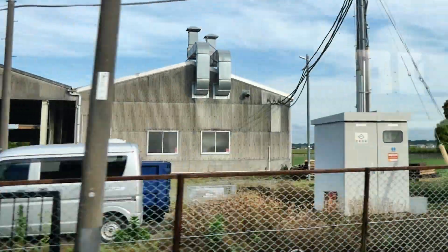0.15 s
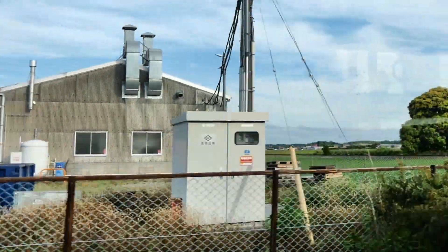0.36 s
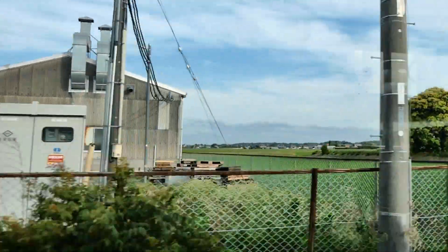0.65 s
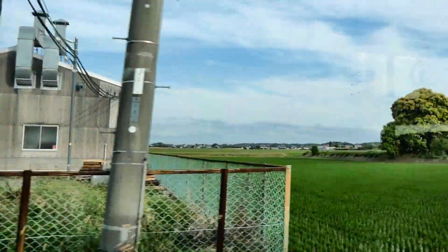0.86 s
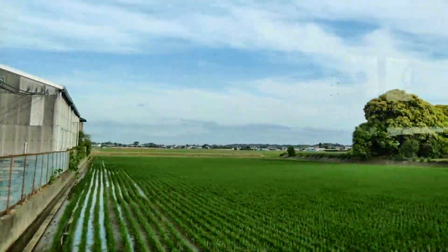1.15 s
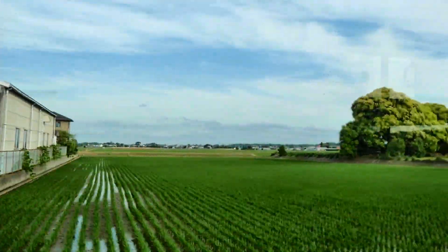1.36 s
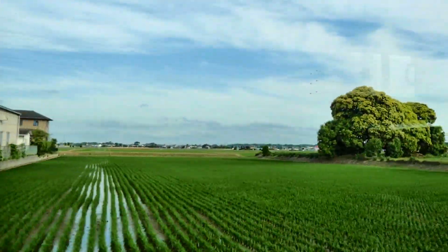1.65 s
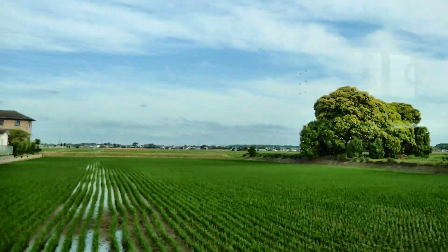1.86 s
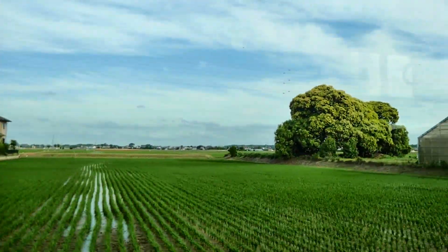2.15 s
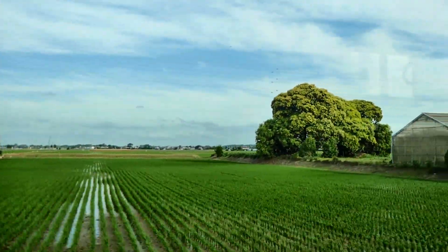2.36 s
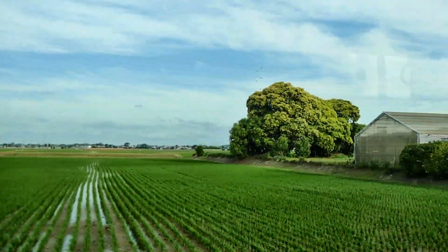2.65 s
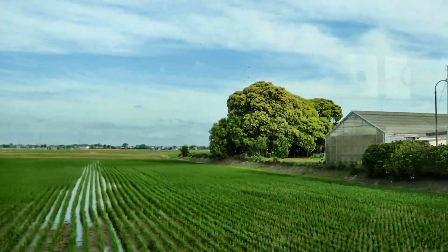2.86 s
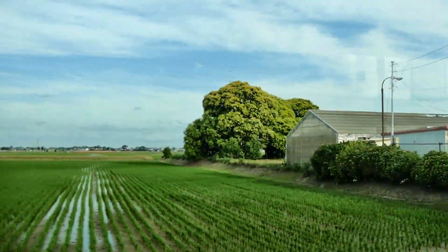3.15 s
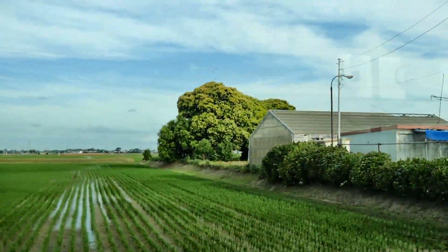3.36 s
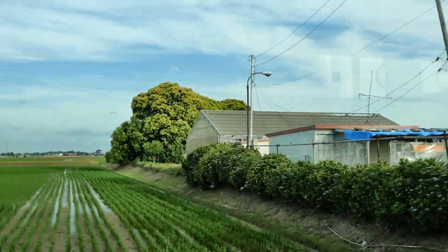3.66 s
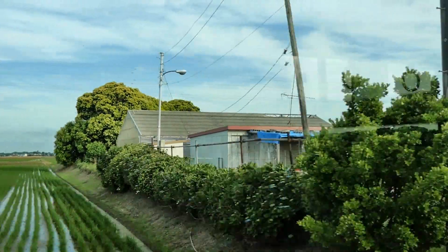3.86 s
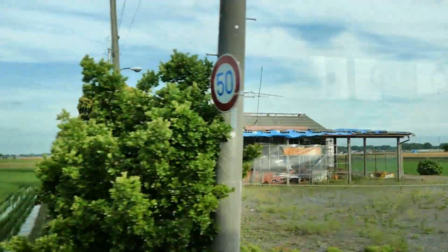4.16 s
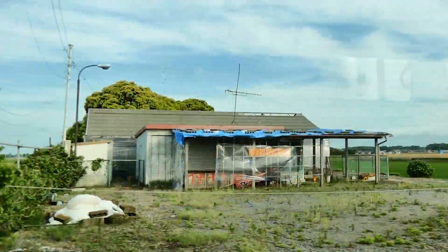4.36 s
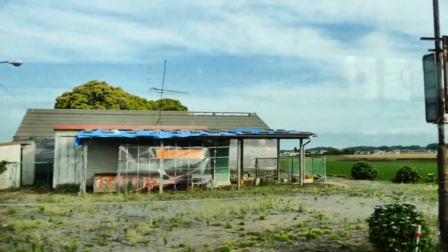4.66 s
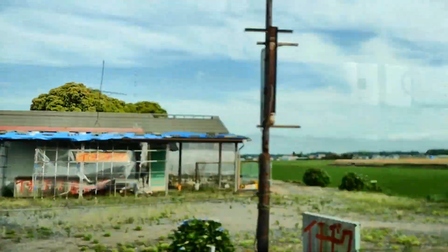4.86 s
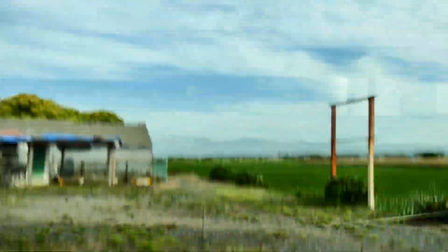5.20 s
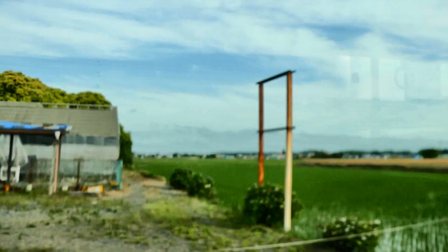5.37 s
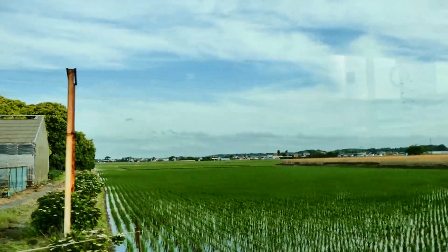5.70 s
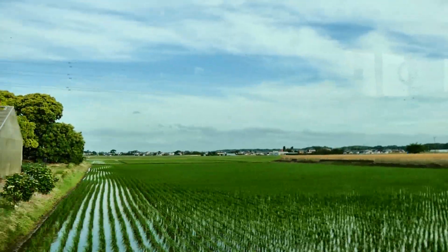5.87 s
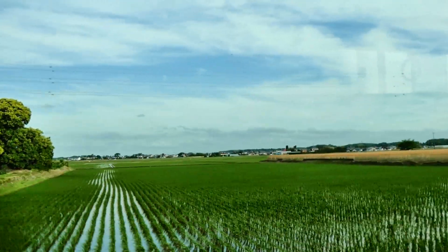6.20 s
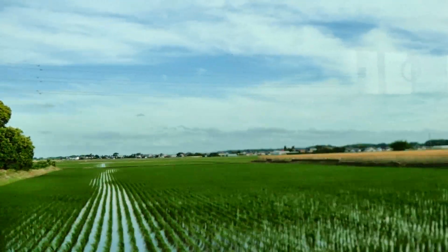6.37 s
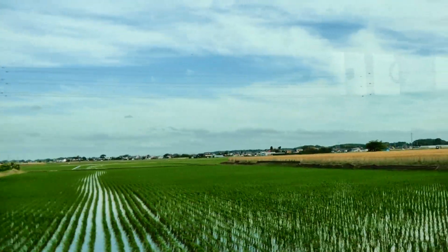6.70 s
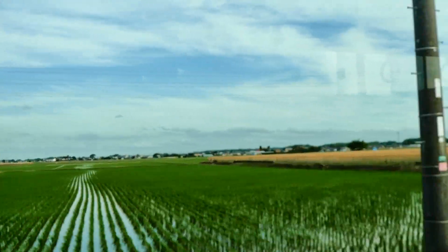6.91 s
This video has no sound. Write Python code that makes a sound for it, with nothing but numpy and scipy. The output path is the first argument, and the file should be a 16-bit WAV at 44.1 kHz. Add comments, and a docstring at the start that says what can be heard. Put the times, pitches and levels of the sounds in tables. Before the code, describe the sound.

A passenger's close perspective in a hollow bus cabin: full, bass-heavy road roar at constant speed, a thin electric drive tone, and airy hiss swelling lightly. A few dry interior clicks and tiny stuttering treble whistles dot the first part. Then two heavy, muffled jolts follow closely, shaking loose fittings with dry clacks and a small metallic clink, before the ride settles into calmer rumble.

```python
"""Tyres rumble through the floor of an electric bus at a steady speed and boom in the cabin: coloured noise.
The drive whines in wavering sine tones, and noise hiss swells and sinks at the window.
Trim ticks as coloured impulses, a metal part clinks, and a thin chirp comes and goes in the treble.
Both axles cross a rough patch: the floor thumps in dying sines, fittings rattle, smoother road follows."""
import sys
import numpy as np
from scipy import signal
from scipy.fft import rfft, irfft
from scipy.io import wavfile

SR = 44100
rng = np.random.default_rng(int(sys.argv[2]) if len(sys.argv) > 2 else 0)


def store_wav(level_fs):
    """Save 16-bit WAV to argv[1]."""
    pcm = np.round(np.clip(np.atleast_2d(level_fs), -1, 1) * 32767)
    wavfile.write(sys.argv[1], SR, pcm.T.astype(np.int16))


N = 310464
TIME = np.arange(N) / SR
BINS = np.fft.rfftfreq(N, 1 / SR)

# hollow cabin resonances and the dips between them: (frequency [Hz], width [Hz], lift [dB])
CABIN_RESONANCES = [(148, 31, 3.5), (196, 14, 7), (230.7, 25, 3), (271, 15, -2.5), (333, 47, 1.5),
                    (398, 39, -4), (519, 18, -2), (588, 22, 1.5), (715, 37, 4.5), (740, 26, -1),
                    (880, 57, 2), (1107, 32, -2), (1150, 64, 1.5), (1430, 106, 4)]


def gain_of(db):
    """Decibels to gain."""
    return 10 ** (np.asarray(db) / 20)


def evened(x):
    """Scaled to rms 1."""
    return x / np.sqrt(np.mean(x ** 2) + 1e-20)


def read(points, hz):
    """A spectrum table read on a log-frequency axis."""
    f, value = np.transpose(points)
    return np.interp(np.log(hz + 1), np.log(f + 1), value)


def follow(rows):
    """A curve over time at every sample."""
    return np.interp(TIME, *np.transpose(rows))


def panned(lean_db):
    """Left and right gains for a left-minus-right level difference."""
    return gain_of(np.array([lean_db, -lean_db]).reshape(2, -1) / 2)


def add(mix, s, sound):
    """Mixes a sound in at time s."""
    part = mix[:, max(round(s * SR), 0):][:, :sound.shape[-1]]
    part += sound[..., :part.shape[1]]


def drift(rate_hz):
    """Random drift of rms 1, mostly slower than rate_hz."""
    lowpass = 1 / (1 + (BINS / rate_hz) ** 4)
    return evened(irfft(rfft(rng.standard_normal(N)) * lowpass, N))


def lift_db(resonances):
    """Lift of a set of resonances at each frequency of the long spectrum."""
    return sum(db / (1 + (2 * (BINS - hz) / width) ** 2) for hz, width, db in resonances)


def noise(spectrum_db):
    """Noise in the cabin, rms 1: alike at both ears in the bass, diffuse in the treble."""
    # difference between the ears: (frequency [Hz], side minus mid [dB])
    ear_width = [(30, -23), (70, -30), (170, -45), (280, -19.5), (450, -19), (700, -9), (1000, 1.5),
                 (2000, -1), (5000, -0.5), (9000, 0), (14000, -5)]
    # lean to one ear: (frequency [Hz], left minus right [dB])
    ear_lean = [(60, 0.5), (450, -0.5), (700, 2), (1000, 5.5), (1400, -1.5), (2500, -1.5), (5500, -2),
                (10000, 0)]
    mid, side = rfft(rng.standard_normal((2, N)))
    width = gain_of(read(ear_width, BINS))
    ears = np.array([mid + width * side, mid - width * side]) / np.sqrt(1 + width ** 2)
    coloured = ears * panned(read(ear_lean, BINS)) * gain_of(spectrum_db)
    return evened(irfft(coloured, N))


def ring(modes, t, scatter):
    """Dying modes, detuned a little by every blow, with chance phases at each ear."""
    hz, t60, db = np.transpose(modes)[:, :, None]
    hz = hz * (1 + scatter * rng.standard_normal(hz.shape))
    phase_turns = rng.random((2, len(modes), 1))
    swing = np.sin(2 * np.pi * (hz * t + phase_turns))
    return (gain_of(db - 60 * t / t60) * swing).sum(1)


def surface_db():
    """Coarseness of the road as a level: steady, then sinking to a smoother road."""
    middle_s, over_s, change_db = 5.4, 0.87, -2.5
    return change_db * np.clip((TIME - middle_s) / over_s + .5, 0, 1)


def reflections(x, wet_db, t60):
    """Windows and seats give a short diffuse tail."""
    t = np.arange(SR // 3) / SR
    tail = rng.standard_normal((2, len(t))) * gain_of(-60 * t / t60) * (t > .004)
    tail = tail / np.linalg.norm(tail[0])
    return x + gain_of(wet_db) * signal.fftconvolve(x, tail, axes=1)[:, :N]


def chirps(level_db, width_hz, stutter_db, arch_hz):
    """A narrow, stuttering whistle comes and goes, its pitch rising as it swells."""
    # thin chirps in the treble: (start [s], length [s], level before level_db [dB], mean pitch [Hz])
    whistles = [(.17, .09, -51, 8330), (.6, .08, -49, 8380), (0.794, 0.12, -39, 8400),
                (1.002, 0.059, -43, 8400), (1.127, .05, -53, 8220), (1.29, 0.06, -48, 8200),
                (1.467, .05, -50, 8400), (1.505, 0.1, -42, 8180), (1.545, 0.15, -40, 8480),
                (1.735, .05, -43, 8400), (2.02, .05, -52, 8420), (2.19, 0.19, -46, 8390),
                (2.417, 0.21, -42.5, 8420), (2.658, 0.082, -47, 8400), (2.866, 0.043, -58, 8370),
                (2.95, 0.057, -45, 8460), (3.095, 0.06, -48, 8430), (3.215, .06, -47, 8300),
                (3.37, 0.065, -45, 8400), (3.622, 0.081, -44, 8370), (3.765, 0.11, -49.5, 8420),
                (3.987, 0.06, -45, 8430), (4.222, 0.042, -42, 8420), (4.39, .16, -46, 8350),
                (4.6, .08, -49, 8430), (4.75, 0.17, -37, 8500), (6.125, 0.053, -52, 8400),
                (6.82, .1, -50, 8360), (6.965, .07, -57, 8340)]
    out = np.zeros(N)
    jitter_turns = np.cumsum(width_hz * drift(250)) / SR
    stutter = gain_of(stutter_db * drift(110))
    for s, length, db, hz in whistles:
        on = (TIME > s) & (TIME < s + length)
        swell = abs(np.sin(np.pi * (TIME[on] - s) / length))
        turns = np.cumsum(hz + arch_hz * (swell - swell.mean())) / SR + jitter_turns[on]
        tone = np.sqrt(2) * np.cos(2 * np.pi * turns)
        out[on] += stutter[on] * tone * swell ** 0.45 * gain_of(db + level_db)
    return out


def hiss(level_db, flutter_db):
    """Air and tyre hiss leaks in at the window: a floor that follows the road, and rounded swells."""
    # colour of the hiss: (frequency [Hz], relative level [dB])
    hiss_colour = [(600, 2), (1500, 6), (2500, 5.5), (3800, 2), (5000, -0.5), (6500, 1.5), (8500, 4),
                   (10000, 4), (11500, 1.5), (13500, -5), (15000, -11), (16000, -24)]
    # resonances at the window and dips between them: (frequency [Hz], width [Hz], lift [dB])
    window_peaks = [(3350, 200, 3.5), (3890, 70, 7), (4020, 90, -4), (4480, 250, -2.5)]
    # swells of hiss: (time of the peak [s], half length [s], level before level_db [dB])
    swells = [(0.026, 0.12, -46.5), (0.896, 0.054, -51.5), (1.048, 0.13, -53), (1.878, 0.17, -49.5),
              (2.48, 0.03, -52.5), (3.058, 0.069, -47), (3.773, 0.04, -57), (4.153, 0.1, -48.5),
              (4.413, 0.12, -45.5), (4.756, 0.067, -45.5), (4.896, 0.027, -42), (5.018, 0.026, -46),
              (5.198, 0.064, -37), (5.366, 0.0082, -35), (5.647, 0.27, -46), (5.92, 0.083, -50.5),
              (6.612, 0.082, -55)]
    floor_db, swell_shape = -58, 1.53  # shape: 1 = pointed, 2 = bell
    power = gain_of(floor_db + surface_db()) ** 2
    for s, half, db in swells:
        power = power + gain_of(db) ** 2 * np.exp(-abs((TIME - s) / half) ** swell_shape)
    leak = noise(read(hiss_colour, BINS) + lift_db(window_peaks))
    return leak * np.sqrt(power) * gain_of(level_db + flutter_db * drift(27))


def clinks(level_db):
    """High, short ringing of a small metal part, equally loud at both ears."""
    # blows: (time [s], level before level_db [dB])
    blows = [(5.49, -22.5), (5.799, -36)]
    # modes of the metal: (frequency [Hz], ring time to -60 dB [s], relative level [dB])
    metal_modes = [(9120, .06, 0), (9190, .1, -7), (9430, .04, -7), (9790, .045, -6)]
    out, t = np.zeros((2, N)), np.arange(SR // 6) / SR
    onset = 1 - np.exp(-t / 0.0008)
    for s, db in blows:
        add(out, s, ring(metal_modes, t, scatter=0.0017)[0] * onset * gain_of(db + level_db))
    return out


def ticks(level_db, snap_db):
    """Plastic trim snaps drily: one sharp impulse, then a brief buzz, coloured by its hollows."""
    # snaps: (time [s], strength before level_db [dB], buzz to -60 dB [s], left minus right [dB])
    snaps = [(.9183, -13.7, .02, -1), (1.3853, -22, .055, -4), (2.11, -27, .02, -2),
             (2.9418, -10.8, .018, -2), (2.9535, -24, .008, 0), (4.2128, -20, .016, -3)]
    # broad colour of a tick: (frequency [Hz], relative level [dB])
    trim_colour = [(300, -4), (550, 8), (1100, 4), (2000, 3), (3200, -3.5), (6500, -5), (9000, -5),
                   (12000, -9), (16000, -23)]
    # hollow resonances of the trim and dips between them: (frequency [Hz], width [Hz], lift [dB])
    trim_peaks = [(1530, 220, -7), (1950, 450, 5), (2450, 300, 4), (2950, 350, -3), (4100, 600, 2),
                  (5200, 300, -6), (6300, 700, 2), (10200, 700, -3)]
    out, t = np.zeros((2, N)), np.arange(SR // 10) / SR
    for s, db, t60, lean_db in snaps:
        buzz = rng.standard_normal((2, len(t))) * gain_of(-60 * t / t60)
        impulse = gain_of(snap_db) * (t == 0)
        add(out, s, panned(lean_db) * gain_of(db + level_db) * (impulse + buzz))
    colour = evened(gain_of(read(trim_colour, BINS) + lift_db(trim_peaks)))
    return irfft(rfft(out) * colour, N)


def drive(whine_db, octave_db, waver_db, wander_hz, tone_waver_db, tone_wander_hz):
    """The gear tone and its octave waver with the load; hum and thin motor tones waver around fixed pitches."""
    # gear whine: (time [s], level before whine_db [dB])
    whine_level = [(0, -25.5), (.35, -25), (1.3, -27.5), (2.35, -35.5), (2.8, -25.5), (3.9, -25),
                   (4.4, -24.5), (5.24, -25), (5.34, -34.5), (7.04, -31.5)]
    # running-gear hum, thin motor and inverter tones: (mean pitch [Hz], level [dB], left minus right [dB])
    motor_tones = [(194, -35, 0), (240, -36, 0), (339, -39.5, 0), (631, -41, 2), (1012, -48, 8.5),
                   (1820, -56, -9), (1897, -62, -2), (2245, -60.5, -2), (2568, -62, -4), (10000, -68.5, 3)]
    whine_hz, sag_hz_per_s = 444.1, 0.15  # the pitch sinks very slightly
    turns = np.cumsum(whine_hz - sag_hz_per_s * TIME + wander_hz * drift(15.4)) / SR
    gear = np.sin(2 * np.pi * turns) * gain_of(follow(whine_level) + whine_db + waver_db * drift(36))
    octave = np.sin(4 * np.pi * turns) * gain_of(octave_db + surface_db() + waver_db * drift(25))
    out = gear + panned(3.9) * octave
    for hz, db, lean_db in motor_tones:
        turns = np.cumsum(hz + tone_wander_hz * drift(23.8)) / SR
        level = gain_of(db + surface_db() + tone_waver_db * drift(8.4))
        out = out + panned(lean_db) * np.sin(2 * np.pi * turns) * level
    return np.sqrt(2) * out  # sine peak to rms


def focus_db(hz, pitch):
    """A fitting sounds weaker away from its own pitch."""
    depth_db, width_octaves = 8, 0.39
    octaves = np.log2((hz + 1) / pitch)
    return depth_db * (np.exp(-(octaves / width_octaves) ** 2) - 1)


def rattles(level_db, ring_db):
    """A loose fitting scuffs its seat briefly: its hollow body sounds around its own pitch and rings faintly."""
    # clacks: (time [s], strength before level_db [dB], main pitch [Hz], full-strength scuff [s])
    clacks = [(4.874, -20.5, 1700, .022), (5.1695, -11.5, 3700, .003), (5.2008, -16.5, 2150, .006),
              (5.216, -20, 2500, .006), (5.232, -22, 3000, .025), (5.3072, -12.3, 2650, .004),
              (5.3535, -18.5, 4800, .003), (5.360, -13, 3850, .005), (5.3698, -17, 6300, .003),
              (5.375, -15.5, 3850, .005), (5.405, -16, 3200, .004), (5.448, -19, 3900, .006),
              (5.464, -15.5, 4300, .003), (5.5335, -13.3, 3750, .003), (5.572, -24.5, 4800, .003),
              (5.661, -19.5, 3700, .008), (5.673, -15.3, 3400, .008), (5.7177, -9.7, 2900, .004),
              (5.8197, -16.8, 3000, .005), (5.96, -25.5, 1900, .015)]
    # ringing of the fittings: (frequency [Hz], ring time to -60 dB [s], relative level [dB])
    fitting_modes = [(2490, 0.026, -4), (3320, 0.032, 0), (3830, 0.045, -5), (4250, .03, -10),
                     (6300, 0.033, -10)]
    # broad colour of a clack: (frequency [Hz], relative level [dB])
    clack_colour = [(400, -39), (1000, 8.5), (1900, 4.5), (2520, 1), (2900, 5), (3350, -4.5), (3950, -1.5),
                    (4400, -0.5), (4900, -5), (6300, -4), (8000, -18), (12000, -13), (16000, -47)]
    # hollow resonances of the fittings and dips between them: (frequency [Hz], width [Hz], lift [dB])
    hollow_peaks = [(1850, 260, -3), (2480, 200, 8), (2870, 300, -10), (3320, 170, 11), (3850, 260, 6),
                    (4800, 400, -4)]
    rise_s, release_lengths = 0.00095, 2.5  # release to -60 dB, in scuff lengths
    out, t = np.zeros((2, N)), np.arange(SR // 6) / SR
    lead = SR // 200  # samples of room ahead of the scuff for the filter
    hz = np.fft.rfftfreq(len(t), 1 / SR)
    body_db = read(clack_colour, hz) + np.interp(hz, BINS, lift_db(hollow_peaks))
    for s, db, pitch, length in clacks:
        colour = evened(gain_of(body_db + focus_db(hz, pitch)))
        modes = [(f, ring_s, mode_db + focus_db(f, pitch)) for f, ring_s, mode_db in fitting_modes]
        release = gain_of(-60 * np.maximum(t / length - 1, 0) / release_lengths)
        contact = np.minimum(t / rise_s, 1) * release
        scuff = np.roll(rng.standard_normal((2, len(t))) * contact, lead, axis=1)
        gain = panned(-2.5) * gain_of(db + level_db)
        add(out, s - lead / SR, gain * irfft(rfft(scuff) * colour, len(t)))
        add(out, s, gain * gain_of(ring_db) * ring(modes, t, scatter=0.011))
    return out


def chatter(level_db, grain_db, before_s, after_s, edge_s):
    """Many small parts chatter while the road is rough, most of all under the front axle."""
    # colour of the chatter: (frequency [Hz], relative level [dB])
    clatter_colour = [(500, -9), (900, 6.5), (1500, 1.5), (2500, -4), (3900, -10.5), (5000, -15),
                      (9000, -26)]
    peak_s, build_db_per_s, settle_db_per_s = 5.165, 11.5, 5.7
    lull_s, lull_half_s, lull_db = 5.59, 0.054, -8  # it eases between the axles
    t = TIME - peak_s
    rough = np.clip(np.minimum(before_s + t, after_s - t) / edge_s, 0, 1)
    db = level_db + np.minimum(build_db_per_s * t, -settle_db_per_s * t)
    db = db + lull_db * np.exp(-((TIME - lull_s) / lull_half_s) ** 2)
    return noise(read(clatter_colour, BINS)) * rough * gain_of(db + grain_db * drift(300))


def thumps(level_db, heave_t60):
    """Each blow sets the floor swinging while the wheel rides over the edge, above a heavier heave of the body."""
    # front, then rear wheels on the edges of the patch:
    # (time [s], level before level_db [dB], floor pitch [Hz], hold [s])
    wheel_blows = [(5.152, -12, 180, 0.016), (5.213, -13, 211, 0.012), (5.262, -9.5, 137, 0.02),
                   (5.306, -15, 126, .016), (5.371, -8.5, 306, .008), (5.527, -16, 177, .012),
                   (5.576, -8, 184, 0.021), (5.638, -8, 199, 0.024), (5.680, -9, 156, 0.022),
                   (5.724, -12, 114, 0.02), (5.803, -15.5, 302, 0.013), (5.845, -18, 220, 0.021),
                   (5.945, -15, 160, .018), (5.985, -16, 222, .012)]
    rise_s, floor_t60 = 0.0054, 0.059
    heave_db, heave_hz = -11, 89  # level relative to the floor
    out, t = np.zeros((2, N)), np.arange(SR // 3) / SR
    for s, db, hz, hold in wheel_blows:
        after = np.maximum(t - hold, 0)
        swing = np.sin(2 * np.pi * hz * t) * gain_of(-60 * after / floor_t60)
        heave = np.sin(2 * np.pi * heave_hz * t) * gain_of(heave_db - 60 * after / heave_t60)
        add(out, s, (swing + heave) * np.minimum(t / rise_s, 1) * gain_of(db + level_db))
    return out


def boom(end_s, end_fade_s):
    """Each axle shakes the body: a quick rise, a hold while it crosses the patch, a fade until smooth road."""
    # colour of the boom: (frequency [Hz], relative level [dB])
    boom_colour = [(25, -32), (50, -23), (80, -4), (130, -1.5), (190, -9.5), (260, -3.5), (340, -6.5),
                   (500, -7.5), (1000, -71)]
    # front and rear axle: (delay [s], level [dB], hold [s], fade [dB per s])
    axles = [(0, -19.5, 0.24, 48), (0.437, -20, .17, 11)]
    patch_s, rise_s = 5.144, 0.042  # the front axle meets the rough patch as its rise ends
    power = np.zeros(N)
    for delay, db, hold, fade in axles:
        t = TIME - patch_s - delay
        rise = np.clip(1 + t / rise_s, 0, 1)
        power += (rise * gain_of(db - fade * np.maximum(t - hold, 0))) ** 2
    shaking = noise(read(boom_colour, BINS) + lift_db(CABIN_RESONANCES))
    return shaking * np.sqrt(power) * np.clip((end_s - TIME) / end_fade_s, 0, 1)


def road(roar_db, flutter_db):
    """Tyre roar follows the surface and fills the cabin resonances."""
    # road noise in the cabin: (frequency [Hz], relative level [dB])
    road_colour = [(20, -38), (38, -29), (49, -18.5), (58, -17.5), (75, -11.5), (105, -12), (170, -8),
                   (300, -9.5), (400, -11), (620, -10.5), (730, -15), (1100, -23.5), (2000, -32),
                   (4500, -46.5), (15000, -66.5)]
    roar = noise(read(road_colour, BINS) + lift_db(CABIN_RESONANCES))
    return roar * gain_of(surface_db() + roar_db + flutter_db * drift(6.9))


def scene():
    """Running noise, the rough patch and the small sounds of the interior."""
    running = road(roar_db=-21.0, flutter_db=.5) + hiss(level_db=9.5, flutter_db=1.6)
    running += drive(whine_db=-2.8, octave_db=-43.5, waver_db=3.0, wander_hz=1.5,
                     tone_waver_db=2.5, tone_wander_hz=1.8)
    bump = boom(end_s=6.1, end_fade_s=0.076) + thumps(level_db=-1.5, heave_t60=0.11)
    bump += chatter(level_db=-30.5, grain_db=3.0, before_s=0.7, after_s=1.0, edge_s=0.2)
    small = rattles(level_db=-7.4, ring_db=-8.5) + ticks(level_db=-6.5, snap_db=14.5)
    small += clinks(level_db=1.0) + chirps(level_db=-6.5, width_hz=108, stutter_db=4.5, arch_hz=110)
    return running + bump + reflections(small, wet_db=-7.5, t60=0.15)


def record(dry):
    """A narrow notch in the treble; then the band limit."""
    notch_hz, notch_half_width_hz, edge_hz = 7850, 130, 15350
    notch = 1 - 1 / (1 + ((BINS - notch_hz) / notch_half_width_hz) ** 2)
    notched = irfft(rfft(dry) * notch, N)
    lowpass = signal.firwin(511, edge_hz, window=("kaiser", 9), fs=SR)
    return signal.oaconvolve(notched, lowpass[None], "same")


dry = scene()
out = record(dry)
store_wav(out)
```